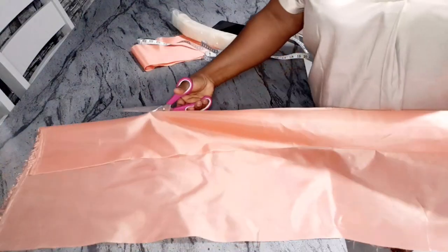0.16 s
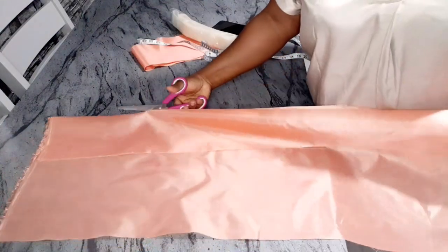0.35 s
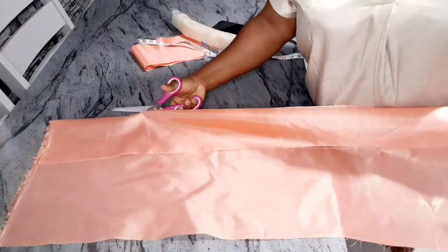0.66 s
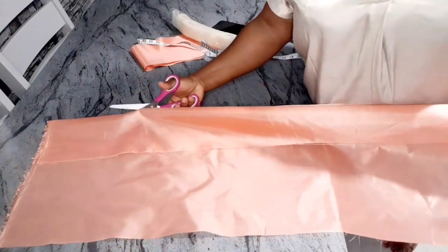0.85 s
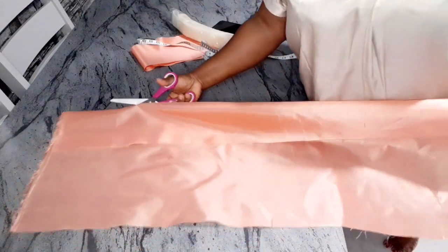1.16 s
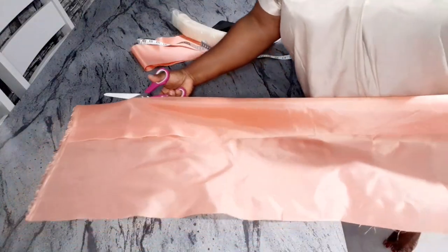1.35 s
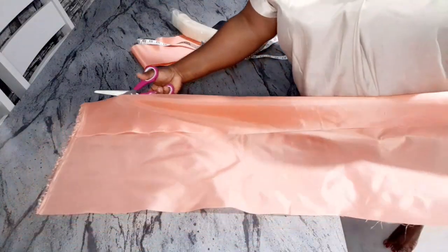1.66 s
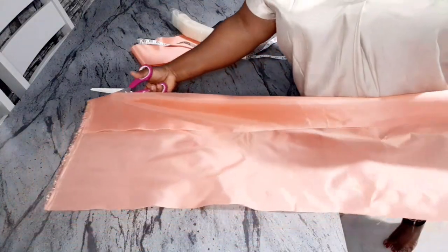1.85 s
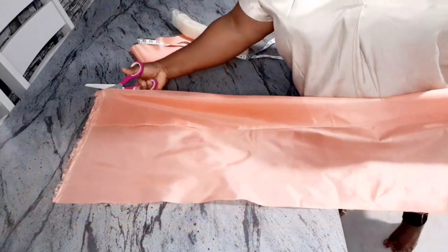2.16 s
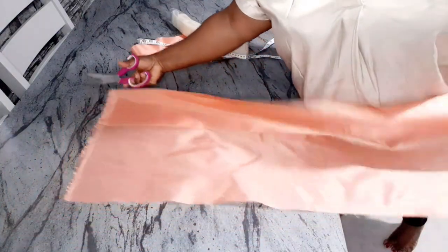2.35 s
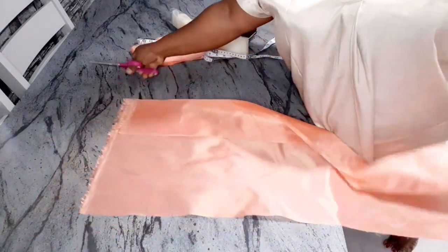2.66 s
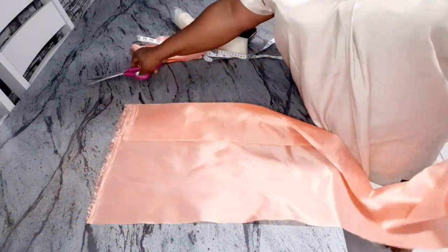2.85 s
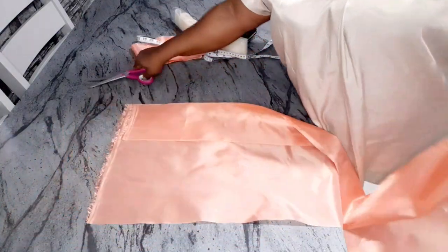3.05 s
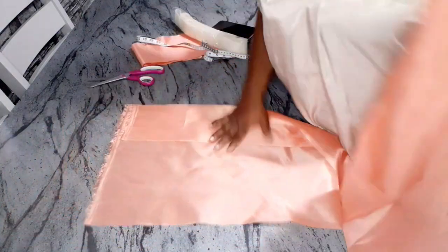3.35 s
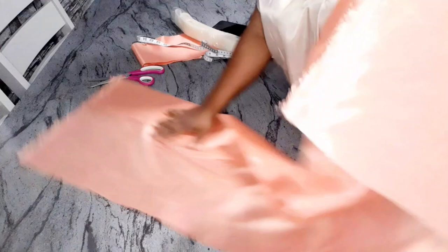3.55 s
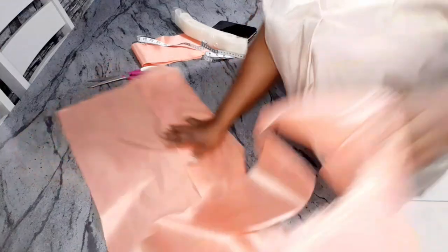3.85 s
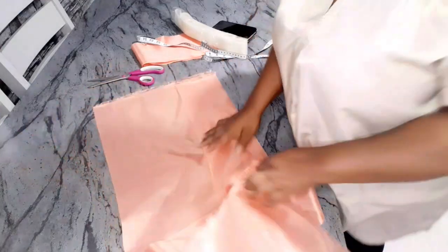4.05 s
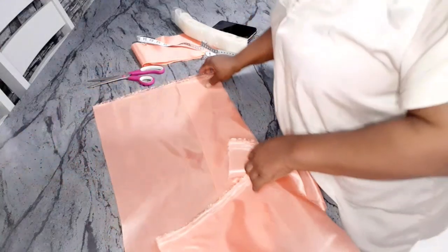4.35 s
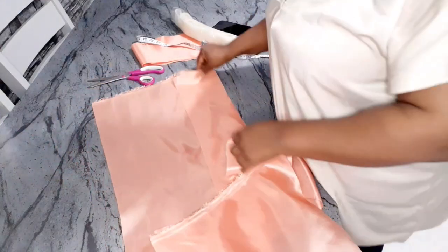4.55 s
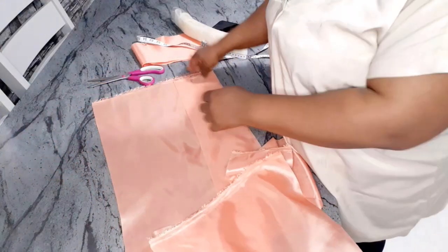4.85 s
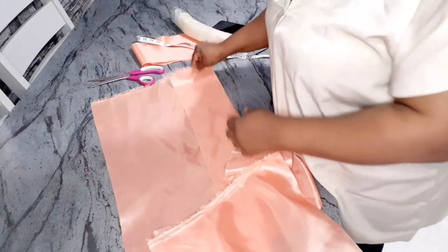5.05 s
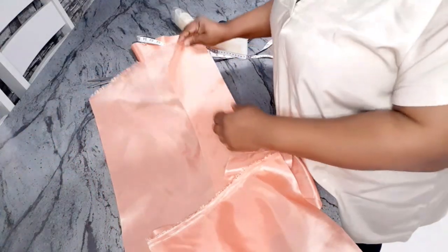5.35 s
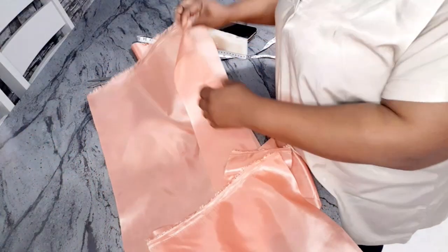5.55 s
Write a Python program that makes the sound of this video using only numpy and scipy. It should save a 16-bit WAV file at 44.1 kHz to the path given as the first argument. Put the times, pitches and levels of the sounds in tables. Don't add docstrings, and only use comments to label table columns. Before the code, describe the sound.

Scissors snip crisply through stiff satin, glide and drum along a stone table, clatter down, then cloth swishes around in a bare room.

```python
import sys
import numpy as np
from scipy import signal
from scipy.fft import rfft, irfft, next_fast_len
from scipy.io import wavfile
from scipy.ndimage import uniform_filter1d, map_coordinates

SR = 44100
rng = np.random.default_rng(int(sys.argv[2]) if len(sys.argv) > 2 else 0)


def elevation(decibels):
    levels = np.asarray(decibels, float)
    return 10 ** (levels / 20)


def wrap_up_sound(samples):
    columns = np.atleast_2d(samples).T
    tamed = np.clip(columns, -1, 1)
    steps = np.round(tamed * 32767).astype(np.int16)
    wavfile.write(sys.argv[1], SR, steps)


N = 250929

# f/Hz, width/Hz, level/dB
DRONE = [(53.3, 20, 0)]
# start t/s, closed t/s, tearing/dB, rasp over tearing/dB, drumming over tearing/dB
SNIPS = [
    (-.06, 0.032, -29.5, 6, -6.5),
    (0.212, .235, -50.5, -3, -2),
    (0.247, 0.307, -32, 3, -4),
    (.362, 0.386, -44.5, 3, 6),
    (0.439, 0.466, -29.5, -2.5, -5.5),
    (0.909, 0.992, -29, -3, -9.5),
]


def unit(x):
    return x / np.sqrt(np.mean(x ** 2) + 1e-20)


def along(points, hz):
    f, v = np.transpose(points)
    return np.interp(np.log(hz + 1), np.log(f + 1), v)


def wobble(rate):
    knots = rng.standard_normal(int(N * rate / SR) + 4)
    return map_coordinates(knots, [np.arange(N) * rate / SR])


def arch(top, rise, fall):
    u = np.arange(N) / SR - top
    return elevation(-20 * (u / np.where(u < 0, rise, fall)) ** 2)


def filtered(x, response):
    m = next_fast_len(x.shape[-1] + 8192)
    spectrum = rfft(x, m) * response(np.fft.rfftfreq(m, 1 / SR))
    return irfft(spectrum, m)[..., :x.shape[-1]]


def colour(points):
    def response(hz):
        cepstrum = irfft(np.log(elevation(np.maximum(along(points, hz), -70))))
        half = len(cepstrum) // 2
        cepstrum[1:half] *= 2
        cepstrum[half + 1:] = 0
        return np.exp(rfft(cepstrum))
    return response


def resonances(peaks):
    def response(f):
        total = 0
        for k, (centre, width, db) in enumerate(peaks):
            damping = 1j * f * width
            total = total + (-1) ** k * elevation(db) * damping / (centre * centre - f * f + damping)
        return total
    return response


def diffuse(pair):
    # f/Hz, left-right likeness (-1 to 1)
    likeness = [(60, 0.97), (180, 0.96), (370, .88), (700, 0.5), (1650, -0.25), (4970, -0.25),
                (15000, -0.55)]

    def mid_side(hz):
        turn = np.arccos(np.clip(along(likeness, hz), -1, 1)) / 2
        return np.array([np.cos(turn), np.sin(turn)])
    mid, side = filtered(pair, mid_side)
    return np.array([mid + side, mid - side])


def snaps(per_second, spread_db, smooth):
    when, how_rare, sign = rng.random((3, N))
    rank = np.minimum(-np.log(how_rare + 1e-9), 3.5)
    clicks = (when < per_second / SR) * elevation(spread_db * rank) * np.sign(sign - .5)
    return unit(clicks) + smooth * rng.standard_normal(N)


def room(x, wet_db):
    # f/Hz, t60/s
    decay = [(100, .6), (500, 0.47), (2000, 0.53), (6000, 0.44), (14000, 0.3)]
    tail_s, build_s, port_lag_s = .8, .00085, .7e-5
    hz, t, z = signal.stft(rng.standard_normal((2, int(tail_s * SR))), SR, nperseg=256)
    fading = z * elevation(-60 * t / along(decay, hz)[:, None])
    tail = diffuse(signal.istft(fading, SR, nperseg=256)[1])
    tail *= 1 - np.exp(-np.arange(tail.shape[1]) / SR / build_s)
    wet = signal.fftconvolve(x[None], tail / np.linalg.norm(tail[0]), axes=1)[:, :N]
    side = np.array([[-1], [1]])
    direct = filtered(np.array([x, x]), lambda hz: np.exp(2j * np.pi * hz * side * port_lag_s))
    return direct * elevation([[.5], [-.5]]) + elevation(wet_db) * wet


def hum():
    # f/Hz, level/dB
    hum_spectrum = [(44, -40), (75, -13), (144, -5.5), (225, -17.5), (295, -15), (578, -22), (740, -20.5),
                    (791, -22), (1480, -27), (1660, -34.5), (3890, -34), (9130, -36), (16000, -33.5)]
    # f/Hz, width/Hz, level/dB
    whine = [(2700, 90, -52), (3900, 70, -51)]
    hum_db, drone_db = -55.3, -54.5
    drift_db = .8 * wobble(3) + .8 * wobble(12)
    flicker_db = 3 * wobble(9)
    noise = filtered(rng.standard_normal((2, N)), lambda hz: elevation(along(hum_spectrum, hz)))
    bands = filtered(rng.standard_normal((2, N)), resonances(whine))
    drone = filtered(rng.standard_normal((2, N)), lambda hz: resonances(DRONE)(hz) ** 2)
    out = elevation(hum_db + drift_db) * unit(diffuse(noise))
    out += elevation(flicker_db) * bands
    return out + elevation(drone_db) * unit(diffuse(drone))


def cutting():
    # f/Hz, level/dB
    thread_spectrum = [(1180, -27), (2000, -7), (2300, -8.5), (2640, -4), (4080, -2), (5780, -5.5),
                       (8120, -4), (9090, -8), (11700, -6), (15200, -6.5), (16000, -19)]
    # f/Hz, level/dB
    rasp_spectrum = [(260, -33), (450, -6.5), (499, -5), (1190, -3), (1280, -4.5), (1680, -4), (3000, -11),
                     (3900, -33.5), (6600, -120)]
    # f/Hz, level/dB
    drum_spectrum = [(82, -34), (140, -10.5), (205, -1.5), (242, -6), (403, -0.5), (470, -3.5), (505, -4.5),
                     (800, -7), (1040, -24.5), (1760, -120)]
    tear, rasp, drum, slab = snips() + glides()
    threads = unit(filtered(snaps(2500, spread_db=4.0, smooth=0.87), colour(thread_spectrum)))
    weave = unit(filtered(snaps(1200, spread_db=2, smooth=1.0), colour(rasp_spectrum)))
    table = unit(filtered(snaps(700, spread_db=2.5, smooth=1.2), colour(drum_spectrum)))
    near = elevation(-0.5 + 2.4 * wobble(60)) * tear * threads
    near += elevation(-6.0) * rasp * weave
    near += elevation(-4.5) * drum * table
    jerk_db = 1.0 * wobble(14)
    return room(elevation(jerk_db) * near + ticks() + blades(), wet_db=-1.0) + elevation(-0.5) * slab * boom()


def snips():
    slab_db = -14
    # dB under the top at the start, lag/s, time to fall 20 dB once closed/s
    laws = ((10.5, 0.00075, 0.031), (10, 0.002, 0.035), (5.8, 0.003, .05), (14, 0.024, 0.039))
    t, out = np.arange(N) / SR, np.zeros((4, N))
    for start, closed, db, rasp_db, drum_db in SNIPS:
        over_db = (0, rasp_db, drum_db, slab_db)
        for layer, (over, (under_db, lag, fall)) in enumerate(zip(over_db, laws)):
            top = closed + lag
            to_go = np.clip((top - t) / (top - start), 0, 1)
            closing = (t >= start) * arch(top, np.inf, fall) * elevation(-under_db * to_go)
            out[layer] += elevation(db + over) * closing
    return out


def blades():
    ring_over = [-28, -30, -24, -30, -24, -12.5]
    steel_hz, t60_s = 3390, .45
    t, stir = np.arange(N) / SR, np.zeros(N)
    for (_, closed, db, *_), ring_db in zip(SNIPS, ring_over):
        fade_db = 60 * np.maximum(t - closed, 0) / t60_s
        stir += elevation(db + ring_db - fade_db) * arch(closed, .03, np.inf)
    tone = np.sin(2 * np.pi * steel_hz * t + .5 * wobble(30))
    return stir * elevation(1.5 * wobble(40)) * tone


def boom():
    # f/Hz, width/Hz, level/dB
    thud_modes = [(59, 23, -10.5), (124.7, 8.1, 5.5), (224.3, 27, -6.5)]
    return unit(diffuse(filtered(rng.standard_normal((2, N)), resonances(thud_modes))))


def slab_shake():
    deep = unit(diffuse(filtered(rng.standard_normal((2, N)), resonances(DRONE))))
    push = uniform_filter1d((snips() + glides())[1], size=4000)
    return elevation(-15) * push * deep


def ticks():
    # t/s, peak/dB, f/Hz
    clicks = [(0.2174, -30, 2530), (0.2493, -24, 4400), (0.383, -20, 6010), (0.4034, -23, 3040),
              (0.4379, -18, 6370), (0.9052, -25, 3750), (0.9104, -28, 3990), (0.9328, -18, 3780),
              (0.9477, -16, 5900), (1.1478, -19, 8220), (2.0323, -28, 2720), (2.3391, -18, 8520),
              (2.3514, -20, 4490)]
    out, t = np.zeros(N), np.arange(400) / SR
    for s, db, hz in clicks:
        crackle = np.clip(rng.standard_normal(len(t)), -1, 1) + .45 * np.sin(2 * np.pi * hz * t)
        out[round(s * SR):][:len(t)] += elevation(db + 1 - 60 * t / .005) * crackle
    return out


def glides():
    # t/s, push/dB, bite (tearing over push)/dB
    pushes = [
        [(1.143, -32, -3.5), (1.163, -30.5, 0), (1.261, -36.5, 1), (1.325, -32.5, .4), (1.577, -39, -3.9),
         (1.625, -36, -2), (1.825, -37, -1), (1.92, -33, -8.5), (2.014, -35, -1.5)],
        [(2.031, -43.5, -1.5), (2.057, -31, -7.5), (2.18, -30.5, -10), (2.253, -29.5, -8.5),
         (2.335, -28.5, -7.5)],
        [(2.338, -33.5, 5.5), (2.362, -27.5, -8.5), (2.422, -39, -7), (2.458, -55.5, -1.5), (2.52, -46.5, -14)],
    ]
    on_stone = [-1, -12, -14]
    t, out = np.arange(N) / SR, np.zeros((4, N))
    lurch = elevation(-11 + 2.5 * wobble(11))
    for rows, stone_db in zip(pushes, on_stone):
        s, push_db, bite_db = np.transpose(rows)
        active = (t >= s[0]) * np.clip((s[-1] - t) * 40, 0, 1)
        push = elevation(np.interp(t, s, push_db)) * active
        tear = elevation(np.interp(t, s, push_db + bite_db)) * active
        out += [tear, push, elevation(stone_db) * push, lurch * push]
    return out


def knocks():
    # t/s, peak/dB, treble/dB, rise/s, rattle length/s
    blows = [
        (2.589, -27.5, -20.5, 0.00085, 0.096),
        (2.769, -12.5, -5, 0.012, 0.026),
        (2.943, -25, -6, .0006, 0.024),
        (3.1103, -8.5, -5, .0008, 0.054),
        (3.1149, -8.5, 1.5, .0003, 0.0028),
        (4.389, -38.5, -14, .003, 0.02),
        (4.873, -34.5, -20.5, 0.001, 0.033),
    ]
    # f/Hz, width/Hz, level/dB
    bodies = [
        [(400, 81, -1), (930, 120, -1), (1120, 85, -4), (1770, 220, -5.5), (2320, 260, -12.5)],
        [(610, 70, 1), (1060, 200, -8), (1450, 150, -6), (1780, 220, -.5), (2800, 500, -8), (3400, 600, -9),
         (5900, 600, -12)],
        [(700, 300, -4), (1100, 200, -5), (1610, 150, 0), (2030, 250, -5), (2700, 600, -10), (3370, 200, -2),
         (4600, 1800, -14)],
        [(390, 78, -3), (529.5, 94, -2.5), (794, 110, -11), (1207, 92, 0), (1657, 270, -7.5), (2540, 390, -8),
         (3100, 600, -18.5)],
        [(3840, 660, 6), (7700, 5700, -1.5)],
        [(208, 73, 0), (330, 110, 1.5), (503, 170, -4.5)],
        [(407, 170, 2), (653, 148, 1.5), (1330, 190, -3), (1780, 170, -3.5), (2420, 220, -4), (2950, 350, -7),
         (4200, 500, -13)],
    ]
    # f/Hz, level/dB
    blow_spectrum = [(120, -38), (250, -8), (500, 1), (1500, -3.5), (3000, -2), (5000, -6.5), (8000, -30.5)]
    # f/Hz, level/dB
    crack_spectrum = [(1760, -32), (3000, -2.5), (5220, -5.5), (7350, -11.5), (7940, -8), (9400, -15),
                      (12200, -12.5), (16000, -22)]
    thud_db, thud_grows = -17, .4
    thud_needs_s = .012
    out, t = np.zeros((2, N)), np.arange(N) / SR
    contacts, low = snaps(1500, spread_db=3.5, smooth=0.67), boom()
    for (s, db, treble_db, rise, length), peaks in zip(blows, bodies):
        u = np.maximum(t - s, 0)
        swell = (1 - np.exp(-u / rise)) * elevation(db - 7.5)
        first = 2.05 * np.exp(-u / 0.0028)
        rattle = swell * (np.exp(-(u / length) ** 4) + first) * contacts

        def struck(shape):
            return filtered(rattle, shape) / np.std(filtered(contacts, shape))
        ring = struck(resonances(peaks))
        broad = struck(colour(blow_spectrum))
        crack = struck(colour(crack_spectrum))
        out += room(ring + 0.55 * broad + elevation(treble_db) * crack, wet_db=5)
        low_db = thud_db + (thud_grows - 1) * db + 20 * np.log10(min(length / thud_needs_s, 1))
        out += swell * elevation(low_db - 60 * np.maximum(u - length, 0) / 0.5) * low
    return out


def cloth():
    # f/Hz, level/dB
    swish_spectrum = [(180, -42), (300, -15.5), (885, -10), (1360, -13.5), (1640, -13), (1780, -7.5),
                      (2480, -6.5), (4020, -9), (9390, -13.5), (12100, -13.5), (16000, -16.5)]
    # f/Hz, width/Hz, level/dB
    pocket_modes = [(1150, 300, -7), (1500, 260, 0), (2000, 400, -10)]
    swish, fold = sweeps() + skids()
    hiss = unit(filtered(snaps(4000, spread_db=4.5, smooth=0.65), colour(swish_spectrum)))
    pocket = unit(filtered(snaps(840, spread_db=3.5, smooth=0.92), resonances(pocket_modes)))
    flutter_db = 1.1 * wobble(25)
    out = elevation(-2.5 + flutter_db) * swish * hiss
    return out + elevation(-9.5 + 0.82 * wobble(30)) * fold * pocket


def skids():
    # t/s, swish/dB, fold over swish/dB, fall/dB per s
    slides = [
        (2.595, -41.5, -3.5, 169.5),
        (2.78, -22, 2.5, 235.5),
        (2.942, -34.5, 7, 329),
        (4.9, -54.5, 1, 96),
    ]
    rise_s, fold_falls = 0.0071, 0.58
    t, out = np.arange(N) / SR, np.zeros((2, N))
    for s, db, fold_db, fall in slides:
        fade_db = np.outer([fall, fold_falls * fall], np.maximum(t - s, 0))
        out += elevation(np.array([[db], [db + fold_db]]) - fade_db) * arch(s, rise_s, np.inf)
    return out


def sweeps():
    strokes = [(2.665, .08, .085), (3.49, .095, .13), (3.585, .1, .14), (3.8, .1, .19), (3.9, .12, .2),
               (4.18, .11, .06), (4.3, .12, .1), (4.435, .06, .08), (4.59, .1, .07), (4.9, .3, .5),
               (5.305, .025, .14), (5.476, .06, .08), (5.527, .012, .12)]
    # swish/dB, fold over swish/dB
    pressure = [(-52, 22), (-33, -1), (-34, 7), (-36.5, -0.7), (-40, -2), (-48, -14), (-52.5, -3),
                (-46.5, -5), (-60, -8), (-68, -15), (-61, -2.5), (-63.5, -13.5), (-55, -16)]
    out = np.zeros((2, N))
    for shape, (db, fold_db) in zip(strokes, pressure):
        out += np.outer(elevation([db, db + fold_db]), arch(*shape))
    return out


def air_push():
    lag_s, grows = 0.066, 2.2
    air = unit(diffuse(filtered(rng.standard_normal((2, N)), resonances([(152, 137, 0)]))))
    swing = np.roll(sweeps()[0], round(lag_s * SR))
    return elevation(-45.5) * (swing / swing.max()) ** grows * air


def scene():
    scissors = cutting() + slab_shake() + knocks()
    satin = room(cloth(), wet_db=0.0) + air_push()
    return (hum() + scissors + satin) * elevation([[.4], [-.4]])


def low_pass(x):
    return signal.sosfilt(signal.butter(12, 15830, fs=SR, output="sos"), x)


def record(dry):
    x = filtered(dry, lambda hz: (1j * hz / (30 + 1j * hz)) ** 2)
    x = filtered(x, lambda hz: elevation(-3.5 * np.exp(-((hz - 9300) / 600) ** 2)))
    x = x / (1 + np.abs(x / 1.1) ** 8) ** (1 / 8)
    x = filtered(x, lambda hz: elevation(-30 * np.clip((hz - 15800) / 250, 0, 1)))
    return low_pass(x)


dry = scene()
out = record(dry)
wrap_up_sound(out)
```